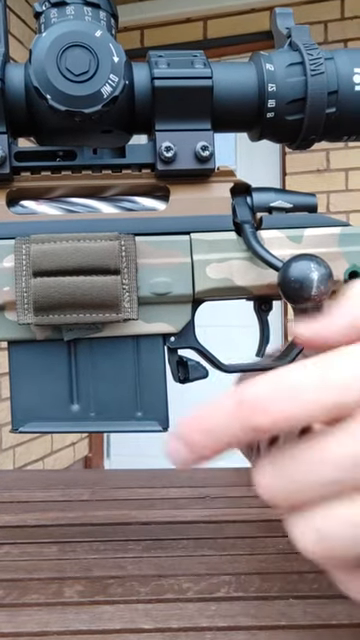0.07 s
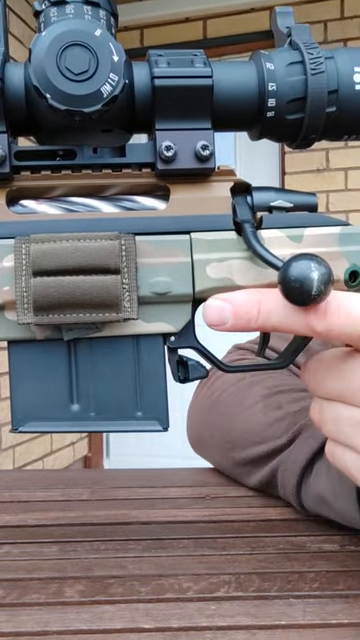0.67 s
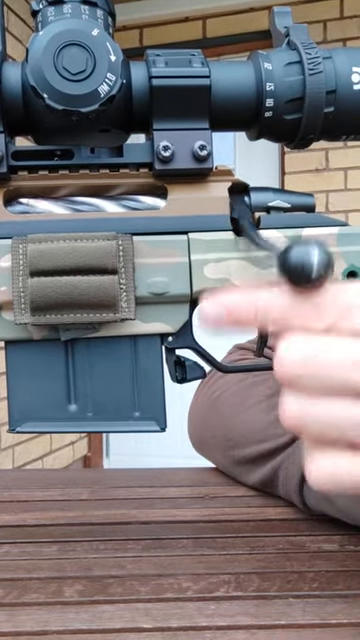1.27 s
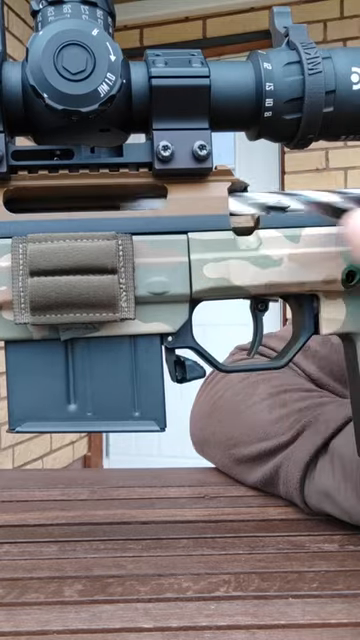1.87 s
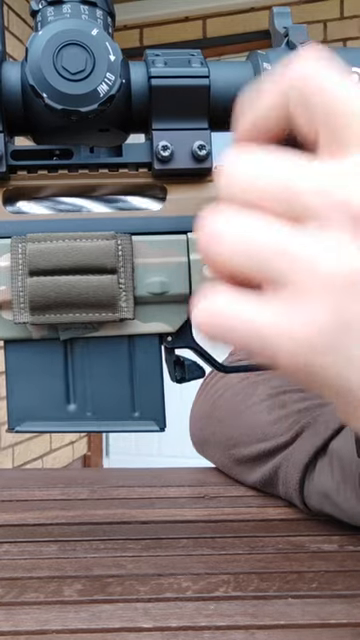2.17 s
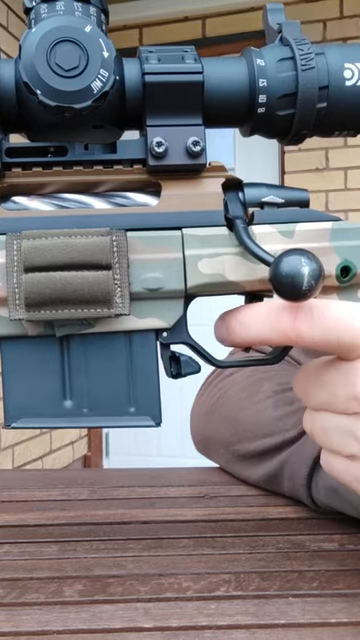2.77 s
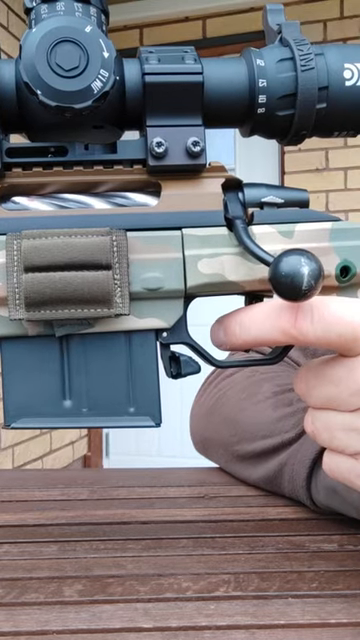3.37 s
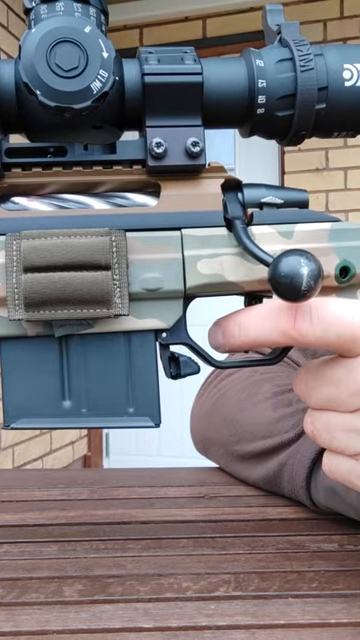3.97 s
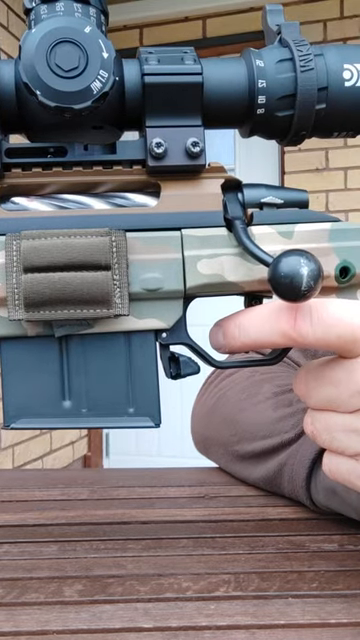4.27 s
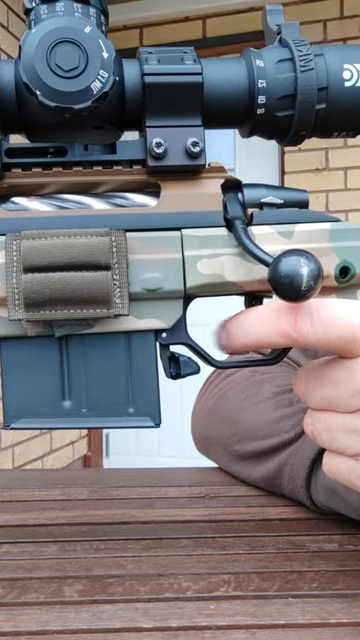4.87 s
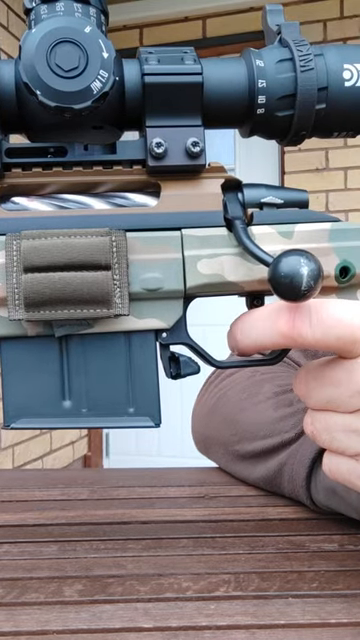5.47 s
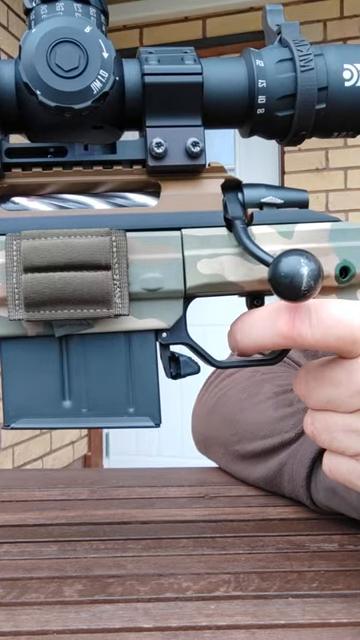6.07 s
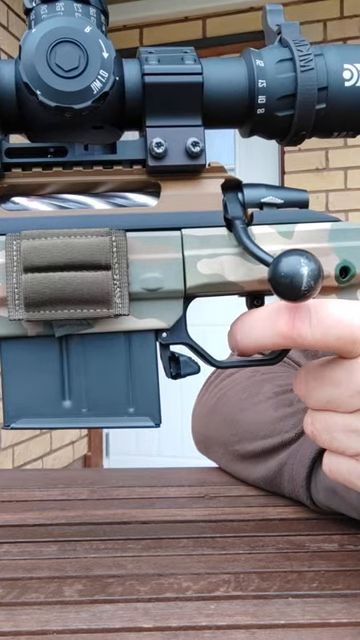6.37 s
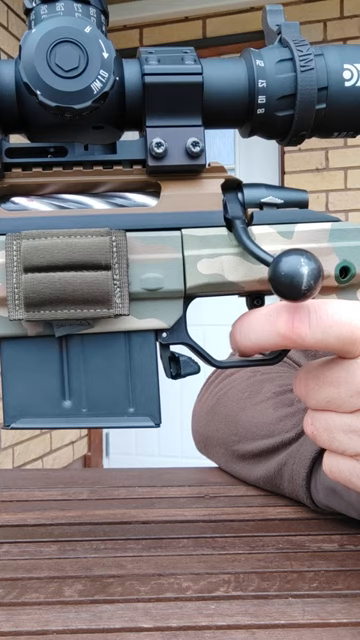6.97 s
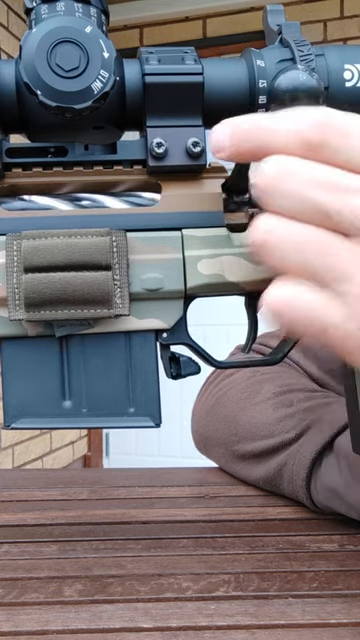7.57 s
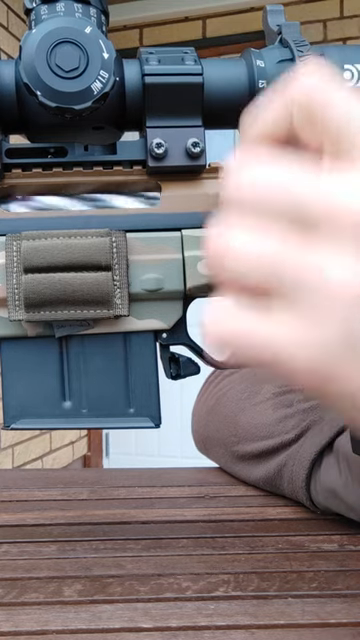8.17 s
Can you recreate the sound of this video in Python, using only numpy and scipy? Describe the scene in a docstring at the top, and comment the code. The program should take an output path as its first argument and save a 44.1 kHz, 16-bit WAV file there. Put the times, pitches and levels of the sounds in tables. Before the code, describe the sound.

Close metallic clacking and sliding of a rifle bolt, a quiet wait, a loud empty trigger snap, then more quick bolt clacks.

```python
"""Dry-firing a bolt-action rifle.

Outdoors at a wooden table, a hand's width from a phone's two microphone ports. A hand brushes in, cycles
the bolt, takes up the trigger, lets the striker snap on an empty chamber and cycles the bolt again.
Steel blows and sliding friction ring the action; nearby walls answer briefly over a faint background hush.
The hardest blows duck the phone's limiter and make its bass lurch."""
import sys
import numpy as np
from scipy import signal
from scipy.fft import rfft, irfft
from scipy.io import wavfile
from scipy.ndimage import uniform_filter1d, minimum_filter1d

SR = 44100
rng = np.random.default_rng(int(sys.argv[2]) if len(sys.argv) > 2 else 0)


def waveform_to_disk(signal):
    """Save audio, clipped to [-1, 1], as 16-bit WAV at the path in sys.argv[1]."""
    frames = np.transpose(np.atleast_2d(signal))
    scaled = np.clip(frames, -1, 1) * 32767
    samples = np.round(scaled).astype(np.int16)
    wavfile.write(sys.argv[1], SR, samples)


N = 362061
TIME = np.arange(N) / SR
STRIKER_S = 6.6915
# bending modes of barrel and scope (frequency [Hz], level [dB], t60 [s])
BARREL_MODES = [(153, -23, 0.17), (256, -30.5, 0.11), (442, -23, 0.1), (729.2, -7, 0.031),
                (980, -9.5, 0.051), (992, -1, 0.1002), (1285, -18.5, 0.088), (1460, -18, 0.049)]
# damped modes of the bolt's raceway (frequency [Hz], level [dB], t60 [s])
RACEWAY_MODES = [(960, -3.5, 0.068), (2270, 3.5, 0.014), (2700, -6.5, 0.016), (3850, -7, .015),
                 (4300, -11, 0.011)]


def striker(snap_db=12, barrel_db=-22):
    """The firing pin slams home on an empty chamber: the hardest and driest blow."""
    # colour of the snap at each port (frequency [Hz], level [dB])
    snap_left = [(100, -3.5), (350, -17), (700, -23), (1500, -24.5), (2400, -13), (4000, -16.5), (6800, -9),
                 (8600, -2.5), (9400, -2.5), (10100, -23.5), (15600, -12.5)]
    snap_right = [(100, -7), (350, -12.5), (700, -14.5), (1500, -14.5), (2400, -7.5), (4000, -8.5),
                  (6800, -3.5), (8600, 2.5), (9400, -12.5), (10100, -20.5), (13000, -17), (15600, -29.5)]
    out = np.zeros((2, N))
    snap = steel_burst(snap_left, snap_right, t60=0.022)
    barrel = ring(BARREL_MODES, TIME[:snap.shape[1]], scatter_db=1.5)
    add(out, STRIKER_S, undb(snap_db) * snap + undb(barrel_db) * barrel)
    return out


def blows(firm_db=-25):
    """Yield bolt blows and trigger ticks (time [s], level [dB], clank [dB], barrel [dB], pan [dB], t60 [s])."""
    # the bolt turns, stops and rattles (time [s], level [dB], receiver clank [dB], left minus right [dB])
    bolt_hits = [(1.2803, -27.5, 9, -0.5), (1.5093, -30.5, 19, -8.5), (1.5225, -6.5, 6.5, 4),
                 (1.5375, -1.5, 7.5, 0.5), (1.542, -3, 6, -0.5), (1.6862, -28.5, 16, -4),
                 (1.7629, -23.5, 32, -2), (1.791, -2.5, -2, -1), (1.8157, -24, 14, 6),
                 (1.9681, -38, 25, -6), (2.0201, -15, 16, -2), (2.0594, -29.5, 9, 0),
                 (2.0879, -22.5, 22, -0.5), (2.1224, -35, 14, -8), (2.1496, -4, 5.5, -0.5),
                 (2.2774, -42.5, 16, 4), (2.2951, -26.5, -4, -5.5), (2.3248, -35, 19, -3),
                 (2.3919, -3, 22.5, 0), (2.3984, -10, 1, -1.5), (7.353, -40.5, 11.5, -2.5),
                 (7.398, -33.5, 4, -5), (7.4619, -24.5, 9.5, -4), (7.6402, -2, 9, 5.5),
                 (7.6584, -1.5, 5, 4), (7.784, -40, 8, -6), (7.8744, 1, 2.5, 1.5), (7.9011, -28.5, 13, -12),
                 (7.936, -40.5, 16, -12), (8.0561, -14.5, 11, -2), (8.0734, -15.5, 17, 2),
                 (8.1005, -25.5, 10, -5), (8.1234, -3.5, 5.5, 0.5)]
    # trigger and sear tick under the finger (time [s], level [dB])
    trigger_ticks = [(0.0436, -50), (2.892, -69), (2.9692, -63), (4.3043, -64.5), (5.005, -35.5),
                     (5.905, -72), (7.2693, -40)]
    for s, db, clank_db, pan_db in bolt_hits:
        # a hard blow is too brief to move the barrel in step: its share falls, and the steel rings longer
        excess_db = max(db - firm_db, 0)
        yield s, db, clank_db, -7.5 - 0.82 * excess_db, pan_db, 0.023 + 0.00015 * excess_db
    for s, db in trigger_ticks:
        yield s, db, 7.5, -20, 0, 0.03


def clacks(clank_hz=4200, clank_octaves=0.79, bolt_db=-3):
    """Each blow is a steel burst, after which a few clear modes of bolt and barrel ring on."""
    # colour of the steel at each port (frequency [Hz], level [dB])
    steel_left = [(100, -22.5), (500, -23), (1600, -18), (2100, -13), (2400, -10), (2750, -14.5),
                  (4200, -15), (6300, -15), (7600, -2), (8900, 2), (9900, -16), (12500, -18),
                  (15600, -26.5)]
    steel_right = [(100, -25), (500, -26.5), (1600, -11.5), (2100, -12.5), (2400, 1.5), (2750, -8),
                   (4200, -9), (5500, -7), (6400, -11), (8000, 0), (9100, -5.5), (10200, -29),
                   (12500, -22.5), (15400, -14)]
    # modes of the bolt body and its knob (frequency [Hz], level [dB], t60 [s])
    bolt_modes = [(2260, -20, 0.029), (2430, -19, .022), (3050, -36.5, .07), (3700, -35, .07),
                  (4113, -40, .08), (5442, -38, 0.12), (7100, -38.5, 0.092), (8382, -41.5, .14),
                  (8716, -39, 0.099)]
    t = TIME[:2 ** 14]
    octaves = np.log2((np.fft.rfftfreq(len(t), 1 / SR) + 1) / clank_hz)
    clank_band = np.exp(-0.5 * (octaves / clank_octaves) ** 2)
    out = np.zeros((2, N))
    for s, db, clank_db, barrel_db, pan_db, t60 in blows():
        steel = steel_burst(steel_left, steel_right, t60, tilt=undb(clank_db * clank_band))
        bolt = undb(bolt_db) * np.array([ring(bolt_modes, t, scatter_db=2.5) for port in range(2)])
        # the heavy barrel takes a few milliseconds to get going
        barrel = undb(barrel_db) * ring(BARREL_MODES, t, scatter_db=2.5) * (1 - fade(t, t60=0.012))
        add(out, s, undb(db) * ((steel + bolt) * pan(pan_db) + barrel * pan(-4)))
    return out


def steel_burst(left, right, t60, tilt=1.0, contact_s=0.00037):
    """A blow chatters for an instant, then crowded steel modes die fast; it starts at rms 1."""
    t = TIME[:2 ** 14]
    chatter = irfft(rfft(noise(len(t), alike=0.65)) * tilt)
    chatter *= fade(np.maximum(t - contact_s, 0), t60)
    steel = np.vstack([colour(chatter[:1], left), colour(chatter[1:], right)])
    return steel / np.sqrt(np.mean(steel[:, :SR // 400] ** 2))


def spring():
    """The striker spring sings on, jolted by bolt stops, the turning handle and the sear."""
    # modes of the spring (frequency [Hz], level [dB], t60 [s])
    spring_modes = [(5534, -43, .45), (5480, -42, .12), (7849, -44, .13)]
    # jolts to the spring (time [s], level [dB])
    pings = [(1.28, -21), (1.538, -2), (1.792, -16), (2.392, 2), (5.005, -32.5), (7.27, -31.5), (7.658, -5),
             (7.875, -12)]
    out = np.zeros((2, N))
    for s, db in pings:
        add(out, s, undb(db) * ring(spring_modes, TIME[:2 ** 14], scatter_db=1.5) * pan(0))
    return out


def friction():
    """Strength of the bolt's rasp, and of the slips that reach the barrel, over time."""
    # the bolt is lifted, pulled, pushed, binds and locks
    # (start [s], end [s], starting friction [dB], final friction [dB], barrel share [dB])
    strokes = [(1.411, 1.451, -57, -51.5, -3.5), (1.644, 1.75, -46.5, -39, -8),
               (1.757, 1.776, -32, -30, -2.5), (1.899, 2.024, -64, -40, -3), (2.02, 2.129, -30, -35.5, -10),
               (2.283, 2.385, -37.5, -58.5, -0.5), (7.356, 7.475, -46, -39.5, -15),
               (7.53, 7.638, -50, -40, -9.5), (7.782, 7.865, -41, -42, -9), (7.984, 8.061, -49.5, -42.5, 2),
               (8.063, 8.099, -23, -26, -4)]
    # the loose bolt rattles at the end of its travel and shakes the barrel (time [s], level [dB])
    rattles = [(1.793, -33), (2.15, -31.5), (7.875, -26.5), (8.124, -31)]
    parts = [(gate(start, end, t60=0.07) * undb(np.interp(TIME, [start, end], [from_db, to_db])), share_db)
             for start, end, from_db, to_db, share_db in strokes]
    parts += [(gate(s, s, t60=0.14) * undb(db), -0.5) for s, db in rattles]
    return sum(level for level, _ in parts), sum(level * undb(share_db) for level, share_db in parts)


def bolt_slide(rasp_db=-2, barrel_db=-6, raceway_db=-4):
    """The bolt rasps over fine machining marks; where it binds, slips make raceway and barrel ring."""
    # colour of steel sliding on steel (frequency [Hz], level [dB])
    rasp_colour = [(150, -24), (550, -12), (850, -9), (1200, -6.5), (1800, -7), (2350, 0.5), (2900, -6),
                   (4300, -8.5), (6500, -11.5), (8500, -2.5), (10200, -23.5), (15500, -24.5)]
    rasping, binding = friction()
    catches = unit(undb(2 * walk(rate=150) + 4.5 * walk(rate=2200)))
    force = noise(N, alike=0.63) * catches
    slips = force[0] * unit(undb(3 * walk(rate=500))) * binding
    barrel = undb(barrel_db) * resonate(slips, BARREL_MODES)
    raceway = undb(raceway_db) * resonate(slips, RACEWAY_MODES)
    rasp = undb(rasp_db) * colour(force * rasping, rasp_colour)
    return (rasp + barrel + raceway) * pan(-2)


def bolt_jolts(onset_t60=0.005):
    """Pushed forward, the bolt sticks and jumps; each jump is a soft push on the raceway modes."""
    # jumps of the bolt (time [s], level [dB])
    jumps = [(2.059, -27), (2.088, -22), (2.122, -27), (8.07, -18), (8.085, -23), (8.101, -27)]
    out, t = np.zeros((2, N)), TIME[:SR // 4]
    for s, db in jumps:
        add(out, s, undb(db) * ring(RACEWAY_MODES, t, scatter_db=2) * (1 - fade(t, onset_t60)) * pan(-3))
    return out


def squeaks(waver=0.012):
    """Stick and slip lock onto one unsteady pitch for a moment."""
    # dry steel and the hand squeak (time [s], length [s], start pitch [Hz], end pitch [Hz], level [dB])
    glides = [(1.728, 0.022, 5300, 5350, -38.5), (1.742, 0.025, 4400, 5100, -39),
              (2.086, 0.0096, 2290, 2280, -15.5), (2.113, 0.018, 2380, 2280, -31),
              (3.35, .11, 1810, 1880, -70), (7.156, 0.0764, 899, 1165, -51),
              (7.829, 0.025, 4400, 4600, -39)]
    out, wobble = np.zeros((2, N)), walk(rate=680)
    for s, length, start_hz, end_hz, db in glides:
        along = np.linspace(0, 1, int(length * SR))
        hz = np.interp(along, [0, 1], [start_hz, end_hz])
        hz *= 1 + waver * wobble[int(s * SR):][:len(along)]
        tone = np.sin(2 * np.pi * np.cumsum(hz) / SR)
        add(out, s, undb(db) * np.sin(np.pi * along) * tone * pan(-4))
    return out


def brushing():
    """How strongly hand and sleeve drag over the stock."""
    # each brush is a smooth swell (middle [s], width [s], level [dB])
    brushes = [(0.05, 0.1, -72), (0.225, 0.012, -57), (0.495, 0.08, -43.8), (0.75, 0.036, -48.5),
               (1.24, 0.043, -71), (1.42, 0.12, -65), (2.47, 0.048, -46), (2.595, 0.025, -40),
               (2.75, 0.12, -74), (3.2, 0.045, -66), (3.42, 0.044, -73), (4.05, 0.06, -82),
               (4.48, 0.17, -78), (6.875, 0.042, -48.5), (7.17, 0.18, -64.5), (7.9, 0.12, -67)]
    return sum(undb(db) / np.cosh(np.clip((TIME - s) / width, -20, 20)) for s, width, db in brushes)


def hand(uneven_db=2.0, grain_db=1.5, gap_s=0.0008, gap_drift=0.18, bounce=0.18):
    """Skin and cloth rub the stock in fine grains; the changing gap under the palm shifts their colour."""
    # colour of the rubbing (frequency [Hz], level [dB])
    skin_colour = [(59, -34.5), (100, -4.5), (492, -3), (570, -3.5), (872, -0.5), (1330, -7.5),
                   (1550, -9.5), (4020, -2.5), (4770, -7), (6150, -2), (6840, -6), (7610, 2.5), (9020, -3),
                   (10200, -19.5), (16000, -16.5)]
    grains = unit(undb(uneven_db * walk(rate=45) + grain_db * walk(rate=1500)))
    rub = colour(noise(N, alike=0.39) * grains, skin_colour)
    earlier = TIME - gap_s * (1 + gap_drift * walk(rate=3.2))
    reflection = np.array([np.interp(earlier, TIME, port) for port in rub])
    return unit(rub + bounce * reflection) * brushing() * pan(-2)


def wood(rest_db=-73, hand_db=-8.5, bolt_db=-12, knock_db=-27, grip_db=-36, grip_s=2.405):
    """The table rumbles as the arms work; the striker knocks it, and the palm thuds onto the stock."""
    # colours of the tabletop's knock and the stock's thud (frequency [Hz], level [dB])
    tabletop_colour = [(25, 3.5), (45, 3.5), (80, 6.5), (110, -1.5), (155, -6.5), (200, -15.5),
                       (400, -21.5), (700, -26.5), (1500, -48.5)]
    stock_colour = [(60, -11.5), (110, -9), (155, 1), (200, -13), (260, -3.5), (400, -10), (700, -10),
                    (1500, -39)]
    bolt_work = uniform_filter1d(friction()[0], size=SR // 6)
    effort = undb(rest_db) + undb(hand_db) * brushing() + undb(bolt_db) * bolt_work
    out = rumble(N, cutoff_hz=17) * effort
    t = TIME[:SR]
    knock = colour(noise(SR, alike=0.97) * fade(t, t60=0.039), tabletop_colour)
    thud = colour(noise(SR, alike=0.5) * fade(t, t60=0.28), stock_colour)
    add(out, STRIKER_S, undb(knock_db) * knock)
    add(out, grip_s, undb(grip_db) * thud * pan(-6.5))
    return out


def walls(x, first_s=0.0087, t60=0.15, echo_db=-25):
    """Table, bricks and roof close by return a short, dense echo."""
    # colour of the echo (frequency [Hz], level [dB])
    echo_colour = [(100, -9), (1000, -10), (2500, -3.5), (6000, 0.5), (8500, -2), (10500, -7),
                   (16000, -8.5)]
    t = TIME[:SR // 2]
    echo = colour(noise(len(t), alike=0.2) * fade(t, t60) * (t > first_s), echo_colour)
    echo /= np.linalg.norm(echo, axis=1, keepdims=True)
    return undb(echo_db) * signal.fftconvolve(x, echo, axes=1)[:, :N]


def hush(level_db=-68, waver_db=0.9):
    """Faint background hush; it rises after the snap and dips at the next hard blows as the phone's gain shifts."""
    # colour of the hush (frequency [Hz], level [dB])
    hush_colour = [(15, -31), (25, 2), (185, -9), (212, -12), (249, -5), (293, -11.5), (503, -6),
                   (641, -11), (775, -2.5), (1440, -13.5), (2280, -25.5), (2550, -28.5), (4370, -30),
                   (5000, -32.5), (16000, -37)]
    # the phone's gain on the hush (time [s], gain [dB])
    phone_gain = [(1.2, -1), (4.0, 0.5), (6.76, -1.5), (6.85, 10), (7.2, 16), (7.58, 14.5), (7.7, 0.5),
                  (7.8, 8.5), (8.2, 2)]
    gain_db = np.interp(TIME, *np.transpose(phone_gain))
    air = colour(noise(N, alike=0.54), hush_colour)
    return air * undb(level_db + gain_db + waver_db * walk(rate=5))


def bass_lurch(swing_db=0.3, swing_s=0.165, swing_spread=0.46, sag_db=-19, shudder_db=-24):
    """The phone's bass at the hardest blows: a deep dip, one swing back, a faint shudder, a slow sag."""
    # lurches (time [s], level [dB])
    lurches = [(1.538, -31.5), (1.792, -34.5), (6.6908, -11), (7.658, -30), (7.875, -29.5), (8.124, -36.5)]
    t = TIME[1:2 * SR]
    onset = (1 - fade(t, t60=0.017)) ** 2
    dip = fade(t, t60=0.2)
    swing = undb(swing_db) * np.exp(-(np.log(t / swing_s) / swing_spread) ** 2)
    sag = undb(sag_db) * fade(t, t60=6.0) * np.sqrt(np.abs(np.sin(np.pi * t / t[-1])))
    out = np.zeros((2, N))
    for s, db in lurches:
        shudder = undb(shudder_db) * rumble(len(t), cutoff_hz=20) * fade(t, t60=1.4)
        add(out, s, undb(db) * (swing - dip - sag + shudder) * onset)
    return out


def undb(db):
    """Decibels to gain."""
    return 10 ** (np.asarray(db) / 20)


def unit(x):
    """Scale to rms 1."""
    return x / np.sqrt(np.mean(x ** 2))


def colour(x, points):
    """Causal filter with the outline (frequency [Hz], level [dB]); white noise keeps its power."""
    hz, db = np.transpose(points)
    size = 2048
    bin_hz = np.fft.rfftfreq(size, 1 / SR)
    gain = unit(undb(np.interp(np.log(bin_hz + 1), np.log(hz), db)))
    cepstrum = irfft(np.log(gain))
    cepstrum[1:size // 2] *= 2  # fold to minimum phase
    cepstrum[size // 2 + 1:] = 0
    response = irfft(np.exp(rfft(cepstrum)))
    return signal.fftconvolve(x, response[None], axes=1)[:, :x.shape[1]]


def noise(size, alike):
    """White noise at two ports that share the fraction `alike` of its power."""
    shared, *own = rng.standard_normal((3, size))
    return np.sqrt(alike) * shared + np.sqrt(1 - alike) * np.array(own)


def rumble(size, cutoff_hz):
    """Low noise at rms 1, nearly the same at both ports."""
    lowpass = signal.butter(2, cutoff_hz, fs=SR, output="sos")
    return unit(signal.sosfilt(lowpass, noise(size, alike=0.93)))


def fade(t, t60):
    """Exponential decay, 60 dB in t60 seconds."""
    return np.exp(-np.log(1000) * t / t60)


def gate(start, end, t60, attack_s=0.0054):
    """Quick attack, hold until the end, exponential release."""
    return np.clip((TIME - start) / attack_s, 0, 1) * fade(np.maximum(TIME - end, 0), t60)


def ring(modes, t, scatter_db):
    """Decaying modes; each blow lands elsewhere and weights them anew."""
    return sum(undb(db + scatter_db * rng.standard_normal()) * fade(t, t60) * np.sin(2 * np.pi * hz * t)
               for hz, db, t60 in modes)


def resonate(force, modes):
    """Drive a set of modes with a noisy force, keeping its power."""
    response = ring(modes, TIME[:SR // 4], scatter_db=2.5)
    return signal.fftconvolve(force, response / np.linalg.norm(response))[:N]


def walk(rate):
    """Random wander at rms 1, turning `rate` times a second."""
    knots = rng.standard_normal(int(N / SR * rate) + 2)
    return unit(np.interp(TIME * rate, np.arange(len(knots)), knots))


def pan(db):
    """Gains of the two ports for a left minus right level."""
    return undb(np.array([[db], [-db]]) / 2)


def add(track, s, sound):
    """Mix a sound in at s seconds."""
    start = int(s * SR)
    track[:, start:start + sound.shape[1]] += sound[:, :N - start]


def scene():
    """Rifle and hand close to the microphone, the table beneath, walls nearby and the hush behind."""
    rifle = clacks() + spring() + striker() + bolt_slide() + bolt_jolts() + squeaks()
    near = rifle + walls(rifle) + hand()
    near[1] = np.roll(near[1], 8)  # the sound reaches the right port a little later
    return near + wood() + hush()


def record(dry, ceiling=1.024, release_s=0.0067, linger_s=0.07, linger_gain=1.7, top_hz=15800):
    """The phone's limiter ducks and recovers fast, then slowly; the bass lurches; the top is cut."""
    over_db = 20 * np.log10(np.maximum(np.abs(dry).max(axis=0) / ceiling, 1))
    duck_db = -minimum_filter1d(-over_db, size=265, origin=-100)  # looks 5 ms ahead
    poles = np.exp(-1 / (np.array([release_s, linger_s]) * SR))
    fast, slow = (signal.lfilter([1 - pole], [1, -pole], duck_db) for pole in poles)
    duck_db = np.max([duck_db, fast, linger_gain * slow], axis=0)
    limited = dry * undb(-uniform_filter1d(duck_db, size=45))
    lowpass = signal.ellip(8, 0.2, 60, top_hz, fs=SR, output="sos")
    return signal.sosfilt(lowpass, np.clip(limited + bass_lurch(), -1, 1))


dry = scene()
out = record(dry)
waveform_to_disk(out)
```